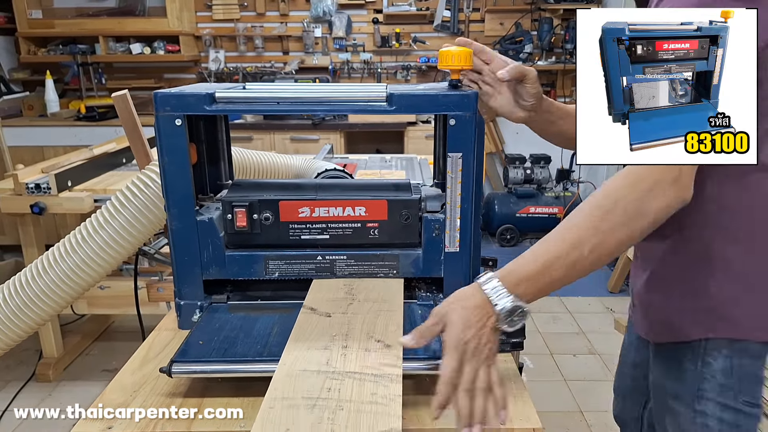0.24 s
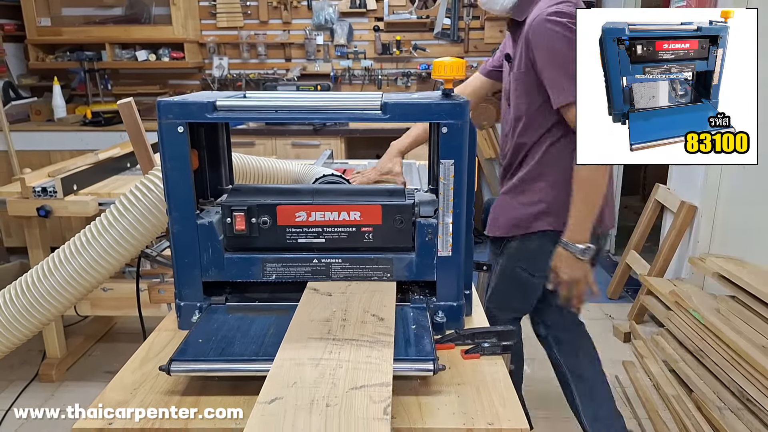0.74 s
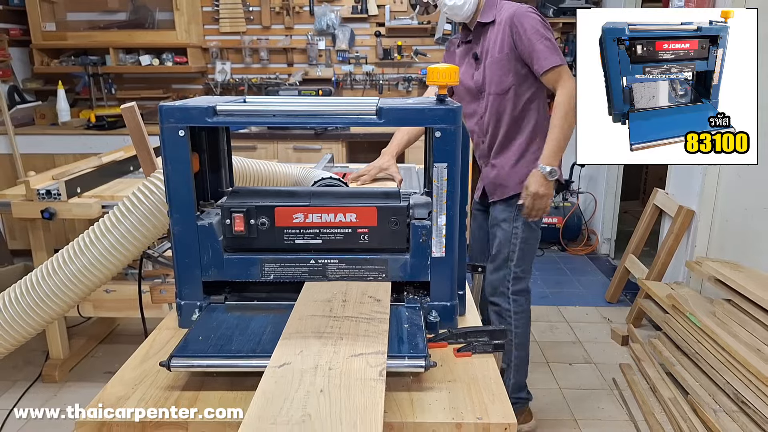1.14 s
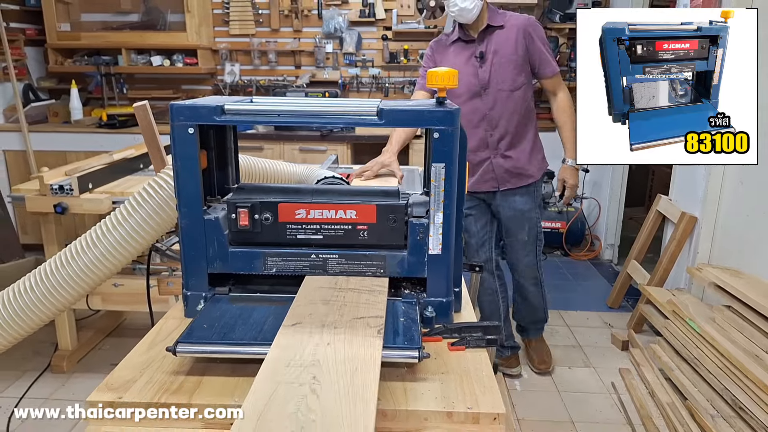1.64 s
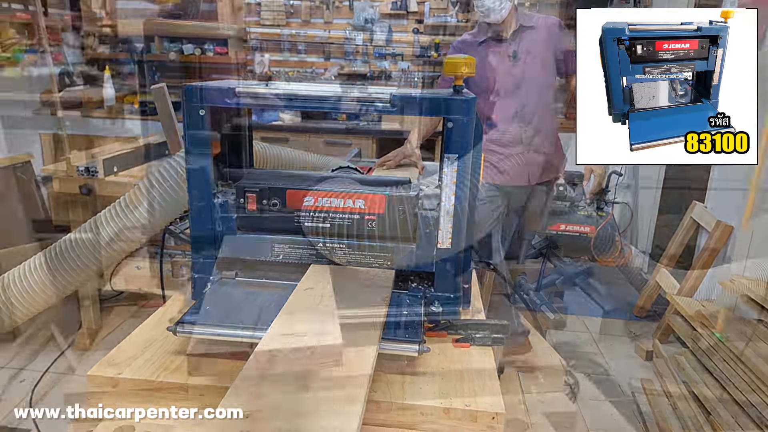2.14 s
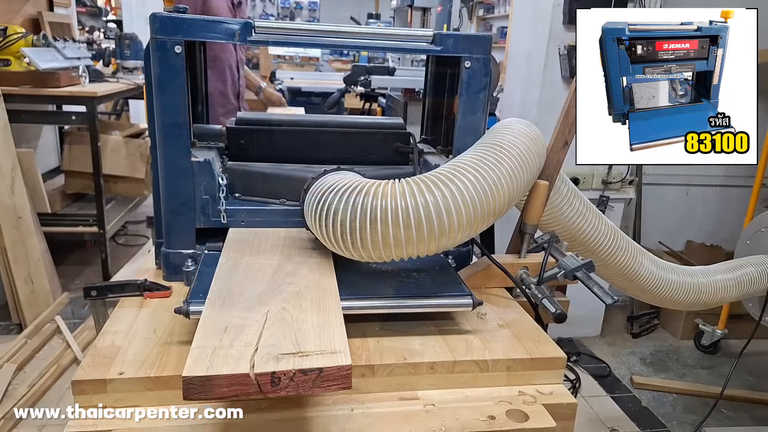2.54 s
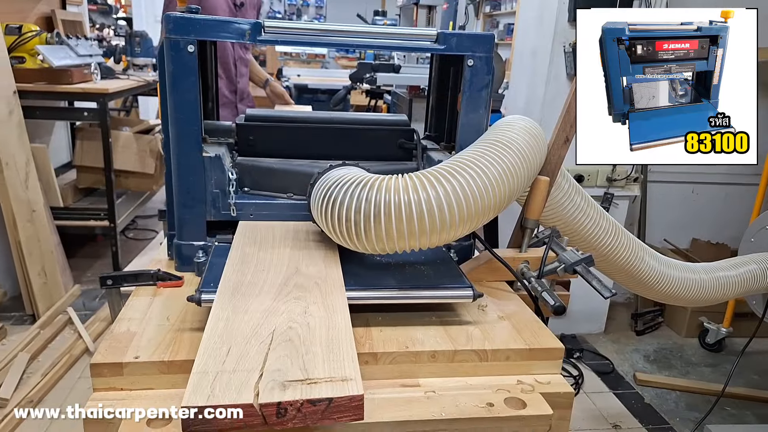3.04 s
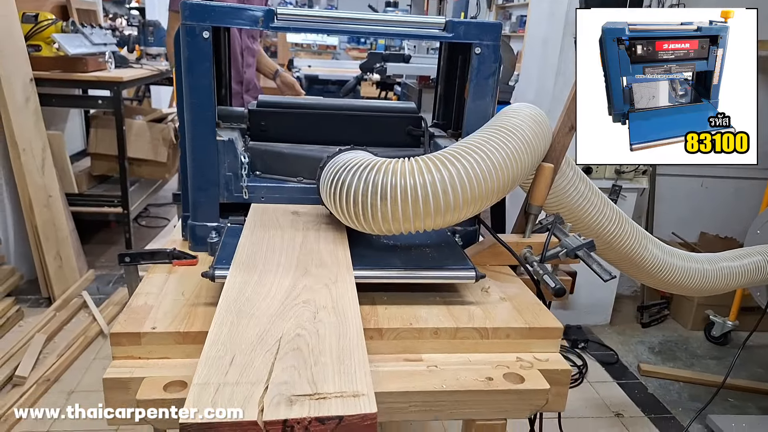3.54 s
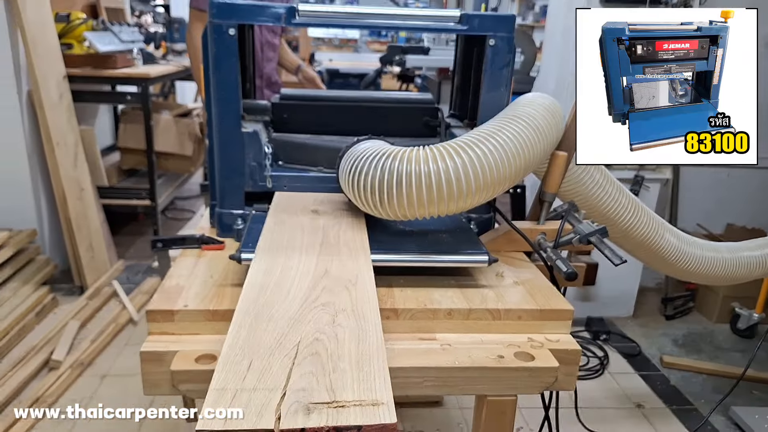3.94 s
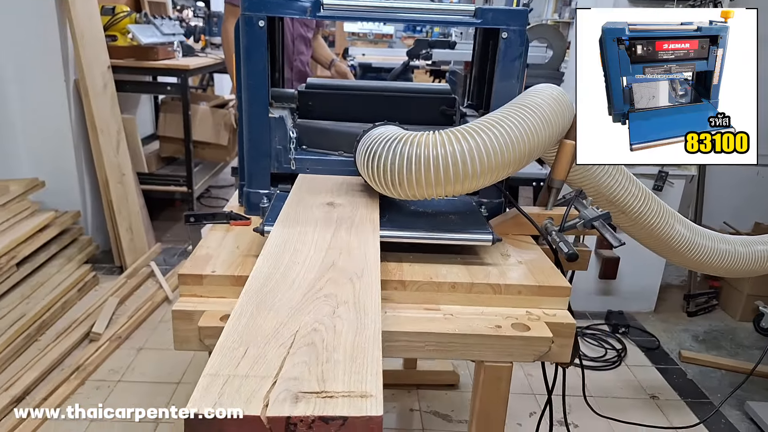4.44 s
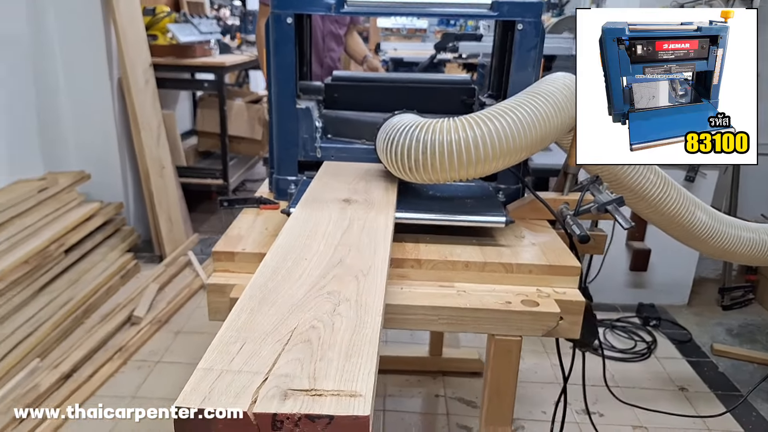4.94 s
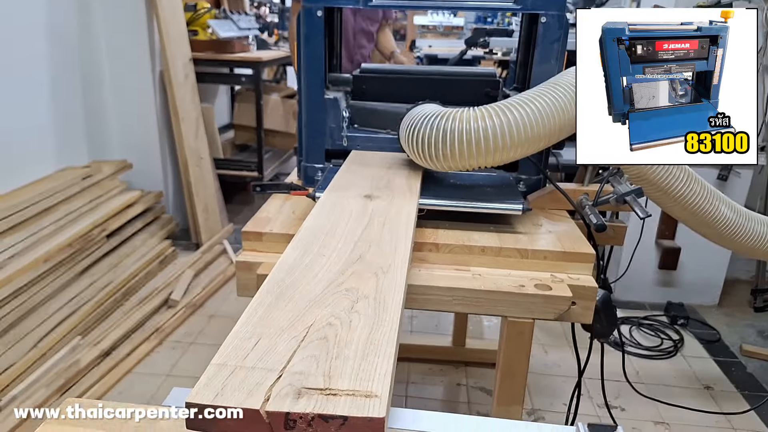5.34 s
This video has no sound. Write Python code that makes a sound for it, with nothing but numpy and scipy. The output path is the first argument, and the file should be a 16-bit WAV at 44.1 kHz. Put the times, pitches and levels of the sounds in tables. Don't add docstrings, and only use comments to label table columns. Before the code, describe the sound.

A benchtop planer is already cutting at 0 s, heard close in a workshop in wide stereo. Rapid knife blows fuse into a harsh, harmonically rich whine, with a strong low tone around 400 Hz, belt-motor hum, faint mains hum and dense hiss of chips and air. The pitch sags over the first second, is lowest near 1.1 s, then climbs as the cut lightens; individual overtones swell and drop unevenly. From about 2.2 to 2.7 s the sound crossfades, dipping slightly, to the outfeed side: a lower, steadier drone with smoother hiss. A table ring near 1.1 kHz grows to a piercing peak around 3.9 s, drops, is faintest near 4.45 s and returns near 4.9 s. Soft low wooden bumps come at about 3.05 and 3.55 s, firmer ones at 5.13 and 5.3 s. Pitch edges up as the cut deepens; the machine is still running at the end.

```python
import sys
import numpy as np
from scipy import signal
from scipy.fft import rfft, irfft, next_fast_len
from scipy.io import wavfile
from scipy.ndimage import map_coordinates

SR = 44100
rng = np.random.default_rng(int(sys.argv[2]) if len(sys.argv) > 2 else 0)


def boost(x):
    u = np.asarray(x, float) / 20
    return 10 ** u


def dump(signal):
    limited = np.clip(np.atleast_2d(signal).T, -1, 1)
    pcm = np.round(limited * 32767).astype(np.int16)
    wavfile.write(sys.argv[1], SR, pcm)


N = 246959
T = np.arange(N) / SR


def curves(table):
    s, *columns = np.transpose(table)
    return [np.interp(T, s, column) for column in columns]


def at_hz(table, hz):
    f, value = np.transpose(table)
    return np.interp(np.log(hz), np.log(f), value)


def bell(x, centre, spread):
    return np.exp(-.5 * ((x - centre) / spread) ** 2)


def walk(rate):
    coarse = T[::64]
    points = rng.standard_normal(int(N / SR * rate) + 4)
    smooth = map_coordinates(points, [1 + coarse * rate], order=3, prefilter=False)
    return 1.45 * np.interp(T, coarse, smooth)


def stereo(mid, side):
    return np.array([mid + side, mid - side])


def spectrum_hz(size):
    return np.maximum(np.arange(size // 2 + 1) * SR / size, 1.)


# (frequency [Hz], side minus mid [dB])
WIDTH = [(60, -6), (110, -6), (200, -14), (380, -6), (700, -10), (1290, -1.5), (2380, 0.5), (4400, 3.5),
         (8120, 0.5), (15000, 0)]


def side_db(hz):
    return at_hz(WIDTH, hz)


def drum(hz, soft, wobble):
    hz = hz + sum(gain * bell(T, s, spread) for s, spread, gain in soft)
    phase = 2 * np.pi * np.cumsum(hz * (1 + wobble * walk(29.7))) / SR
    return hz, phase


def knives(hz, phase, lone_db, cut_db, orders, casing, flares, tail, lone, swell_db, flutter_db):
    peak_share = .6
    bite_db = 1.5 * np.exp(-T / .07)
    edge_db = .9 + .2 * cut_db + bite_db
    out = np.zeros((2, N))
    for k in range(1, 73):
        line_hz = k * hz.mean()
        flare_db = sum(db * bell(T, s, spread) for s, order, spread, db in flares if round(order) == k)
        casing_db = sum(db * bell(k * hz, f, spread) for f, spread, db in casing
                        if abs(f / line_hz - 1) < .12)

        reach = min(k / 24, 1)
        swell = walk(9.0)
        uneven = np.where(swell > 0, peak_share * swell, swell / peak_share)
        wander_db = (k != lone) * reach * swell_db * uneven
        wander_db = wander_db + flutter_db * (.55 + .55 * reach ** .5) * walk(20)

        if k == lone:
            line_db = lone_db
        else:
            own_db = orders[k - 1][1] if k <= len(orders) else at_hz(tail, k)
            line_db = own_db + cut_db + reach ** 2 * edge_db
        level_db = line_db + wander_db + flare_db + casing_db

        angle = k * phase + 2 * np.pi * rng.random() + 0.47 * walk(3.44)
        side_level_db = side_db(line_hz) - 3.5 + 1.8 * walk(2.61)
        side_angle = angle + np.pi / 2 + 0.91 * rng.standard_normal() + 1.03 * walk(5.983)
        side = boost(side_level_db) * np.cos(side_angle)
        out += np.sqrt(2) * boost(level_db) * stereo(np.cos(angle), side)
    return out


def motor(mount, hz, phase, double_db):
    belt = 2.6
    centre, width, peak_db, off_db = mount
    angle = belt * phase + 0.12 * walk(11)
    hum = np.cos(angle) + boost(double_db + 2.2 * walk(3.9)) * np.cos(2 * angle)
    resonance = np.exp(-((belt * hz - centre) / width) ** 4)
    level_db = off_db + (peak_db - off_db) * resonance
    return np.sqrt(2) * boost(level_db + 0.82 * walk(14)) * stereo(hum, 0.36 * np.sin(angle))


def hiss(spectrum, phase, chips_db, trim_db, gate):
    size = next_fast_len(N)
    f = spectrum_hz(size)
    shape = boost(at_hz(spectrum, f))
    shape /= np.sqrt(np.mean(shape ** 2 * (f > 8000) * (f < 15000)))
    mid = rfft(rng.standard_normal(size)) * shape
    side = rfft(rng.standard_normal(size)) * shape

    lead = np.clip(0.51 * (1 - f / 9000), 0, 1)
    side = (np.sqrt(1 - lead ** 2) * side + 1j * lead * mid) * boost(side_db(f))

    puff = np.cos(phase) + 1.2 * np.cos(2 * phase + 2.1)
    shared = walk(4.79)
    out = 0
    for hz in 22 * 2 ** np.arange(0, 10, .5):
        band = np.cos(np.pi * np.clip(np.log2(f / hz), -.5, .5)) ** 2
        flicker = boost(0.7 * shared + 1.43 * walk(9))
        gain = flicker * (1 + gate * min(hz / 4000, 1) * puff)
        out = out + gain * stereo(irfft(mid * band, size)[:N], irfft(side * band, size)[:N])
    return out * boost(chips_db + trim_db)


# (time [s], drum rate [Hz], knife line [dB], depth of cut [dB], chip flow [dB])
INFEED = [
    (0, 225.2, -39.5, 2, -39.5),
    (.2, 219.9, -38, 3, -38),
    (.47, 208.7, -37.5, 1.8, -38.5),
    (.8, 206.3, -37, 2, -37),
    (1.12, 200, -34, 0.9, -37),
    (1.39, 203, -32, -0.1, -40),
    (1.57, 207, -34.5, -0.1, -40.4),
    (1.96, 209.6, -33.5, -1.5, -38),
    (2.4, 218.4, -31.5, -2.5, -42),
]
# (time [s], spread [s], rate gain [Hz])
IN_SOFT = [
    (.36, 0.0503, -0.78),
    (1.79, 0.0835, 1.11),
    (2.2, 0.099, -0.41),
]
# (multiple of drum rate [1], level [dB])
IN_ORDERS = [(1, -58.7), (2, -35.6), (3, -48.7), (4, -40.4), (5, -42.2), (6, -36.0), (7, -41.9), (8, -40.9),
             (9, -44.4), (10, -36.3), (11, -40.8), (12, -39.5), (13, -40.6), (14, -38.0), (15, -40.9),
             (16, -39.7), (17, -41.1), (18, -42.3), (19, -43.4), (20, -47.4), (21, -46.2), (22, -44.5),
             (23, -46.2), (24, -46.3)]
# (multiple of drum rate [1], level [dB])
IN_TAIL = [(25, -47), (30, -53), (39, -53.5), (47, -62), (59, -60), (72, -68)]
# (frequency [Hz], spread [Hz], level [dB])
IN_CASING = [(872, 16, 5.5), (1000, 16, 6.0), (1128, 60, -4.5), (1376, 32, -10.0), (1536, 32, 12.0),
             (1808, 16, 6.0), (1936, 60, -4.0), (3184, 8, -15.5), (3424, 60, -5.0), (4352, 8, 8.0),
             (4552, 32, -5.5), (5184, 16, 7.5)]
# (time [s], multiple of drum rate
# [1], spread [s], level [dB])
IN_FLARES = [(0.08, 10, 0.065, -9), (0.1, 16, 0.13, 10), (0.12, 12, 0.22, -5), (0.18, 14, 0.059, -6),
             (0.3, 7, 0.039, 8.5), (0.3, 19, 0.074, 1), (0.34, 22, 0.05, -12.0), (0.34, 24, 0.05, -16.5),
             (0.48, 8, 0.14, 7), (0.519, 13, 0.17, -6), (0.58, 18, 0.092, -5), (0.74, 6, 0.08, -3),
             (0.84, 10, 0.094, 7.5), (0.88, 7, 0.16, 6), (1.02, 16, 0.05, 9), (1.08, 11, 0.052, 4),
             (1.22, 4, 0.082, -15), (1.3, 18, 0.04, 8), (1.48, 14, 0.036, -14), (1.52, 8, 0.13, -12),
             (1.54, 18, 0.065, -6), (1.82, 27, 0.13, 6), (2.02, 7, 0.32, -5), (2.08, 6, 0.32, 3),
             (2.08, 14, 0.028, 9.5), (2.1, 12, 0.05, -13.0), (2.12, 32, 0.08, 11), (2.2, 18, 0.13, -9.5),
             (.01, 20, .05, 9), (.02, 19, .05, 6), (.04, 21, .08, 4.5), (.12, 18, .15, 4),
            (.27, 2, 0.022, -8), (.38, 17, .09, 6), (.41, 2, 0.024, -8), (.42, 11, .12, 6),
            (.94, 2, 0.057, -7), (1.06, 14, .05, 3.5), (1.45, 4, .06, 6), (2.05, 2, .04, -4),
            (2.14, 4, .09, 5.5)]
# (centre [Hz], half width [Hz], peak [dB], off-peak [dB])
IN_MOTOR = (552, 14.5, -45, -56.5)
# (frequency [Hz], density [dB per Hz])
IN_HISS = [(25, -28), (60, -5.5), (130, -6.5), (250, 5), (500, 5), (1200, 12), (3200, 8.5), (5500, 4),
           (8300, 2), (9800, -4), (11000, -4.5), (12200, 3), (13500, -1), (15600, -2.5)]


def infeed_side():
    hz, knife_db, cut_db, chips_db = curves(INFEED)
    hz, phase = drum(hz, IN_SOFT, wobble=0.0005623)
    comb = knives(hz, phase, knife_db, cut_db, IN_ORDERS, IN_CASING, IN_FLARES, IN_TAIL,
                  lone=2, swell_db=2.2, flutter_db=2.76)
    hum = motor(IN_MOTOR, hz, phase, double_db=-18)
    air = hiss(IN_HISS, phase, chips_db, trim_db=-3.5, gate=0.7)
    return comb + hum + air


def mains():
    return np.sqrt(2) * boost(-64) * np.sin(2 * np.pi * 148 * T)


# (time [s], drum rate [Hz], table ring [dB], depth of cut [dB], chip flow [dB])
OUTFEED = [
    (2.5, 183.5, -35.5, -2.5, -42.5),
    (3.0, 183.8, -31, 0.2, -38.5),
    (3.18, 185.1, -27.5, 1.85, -37.5),
    (3.92, 185.1, -21, 1, -38.5),
    (4.04, 182.5, -29.5, 0.1, -38.5),
    (4.45, 182, -35, -1, -38.5),
    (4.89, 184.4, -25.5, -0.65, -38.5),
    (5.12, 187, -29.5, 1.2, -38.5),
    (5.6, 188.9, -30.5, 2, -40),
]
# (time [s], spread [s], rate gain [Hz])
OUT_SOFT = [
    (3.65, .12, -.5),
    (4.229, .05, 2.2),
    (5.36, .08, -0.53),
]
# (multiple of drum rate [1], level [dB])
OUT_ORDERS = [(1, -57.8), (2, -40.4), (3, -43.5), (4, -39.8), (5, -39.3), (6, -29.3), (7, -40.0),
              (8, -40.5), (9, -42.0), (10, -43.4), (11, -38.8), (12, -46.5), (13, -39.5), (14, -43.2),
              (15, -40.6), (16, -39.7), (17, -39.8), (18, -43.2), (19, -41.0), (20, -44.6), (21, -47.0),
              (22, -47.2), (23, -46.0), (24, -50.9)]
# (multiple of drum rate [1], level [dB])
OUT_TAIL = [(25, -50.5), (29, -54), (44, -54.5), (52, -62), (68, -62), (72, -65)]
# (frequency [Hz], spread [Hz], level [dB])
OUT_CASING = [(915, 4.5, -1), (947, 8, 6.5), (1484, 5.6, -7), (1520, 8, 10), (1851, 15, 5.5),
              (1846, 16, -8), (2465, 99, 4), (2646, 14, -10.5), (2825, 5.1, 8), (3040, 5.6, 10),
              (3760, 10, -6), (5920, 8, 12)]
# (time [s], multiple of drum rate,
# rounded [1], spread [s], level [dB])
OUT_FLARES = [(2.77, 15, 0.29, -4), (2.89, 22, 0.15, 12), (2.91, 21, 0.061, 3), (2.93, 8, 0.15, 11),
              (3.11, 18, 0.33, 4), (3.11, 31, 0.41, 7.5), (3.13, 17, 0.33, -6), (3.17, 11, 0.12, -18),
              (3.33, 16, 0.45, -4.5), (3.47, 7, 0.2, -10), (3.51, 19, 0.15, 6.5), (3.53, 13, 0.47, -6),
              (3.67, 15, 0.032, -11), (3.67, 17, 0.08, 9), (4.07, 9, 0.1, 4), (4.15, 8, 0.25, 6),
              (4.31, 16, 0.18, 4), (4.49, 3, 0.12, -18), (4.63, 8, 0.073, -16), (4.83, 9, 0.2, -5),
              (4.85, 11, 0.15, 9), (4.87, 16, 0.05, 14.5), (4.91, 17, 0.15, 11.5), (4.93, 19, 0.22, -6),
              (5.11, 12, 0.18, -13), (5.21, 4, 0.48, 4), (5.55, 9, 0.049, 11), (5.55, 11, 0.12, -12.0),
              (2.74, 14, .06, 8), (2.8, 11, .09, 6.5), (3.98, 8, .06, 5), (4.262, 6, 0.03, 7.5),
             (4.3, 5, .2, 3), (4.95, 16, .2, 4), (5.1, 13, .3, 3.5), (5.22, 15, .15, 8),
             (5.38, 5.96, 0.032, -1.5), (5.52, 23, .08, 5), (5.524, 6.04, 0.026, -12), (5.56, 22, .1, 7),
             (5.58, 8, .1, 7), (5.58, 17, .05, 6)]
# (centre [Hz], half width [Hz], peak [dB], off-peak [dB])
OUT_MOTOR = (475.5, 5, -43.5, -51)
# (frequency [Hz], density [dB per Hz])
OUT_HISS = [(25, -24), (60, -16), (130, -6), (250, 3), (500, 5), (1200, 10), (3200, 8.5), (5000, 3),
            (7700, 3.5), (9900, -3), (12200, -0.5), (15600, -1.5)]


def outfeed_side():
    hz, ring_db, cut_db, chips_db = curves(OUTFEED)
    hz, phase = drum(hz, OUT_SOFT, wobble=0.00052)
    comb = knives(hz, phase, ring_db, cut_db, OUT_ORDERS, OUT_CASING, OUT_FLARES, OUT_TAIL,
                  lone=6, swell_db=2.5, flutter_db=1.6)
    hum = motor(OUT_MOTOR, hz, phase, double_db=-5.5)
    air = hiss(OUT_HISS, phase, chips_db, trim_db=-0.66, gate=0.091)
    return comb + hum + air


# (time [s], peak level [dB], mode [Hz], length [s])
KNOCKS = [
    (3.046, -36, 245, 0.094),
    (3.553, -36, 234, 0.12),
    (5.13, -26.5, 249, 0.071),
    (5.298, -29, 245.3, 0.1),
]


def knocks():
    out = np.zeros(N)
    for s, db, hz, length in KNOCKS:
        t = np.clip((T - s + .012) / length, 0, 1)
        push = np.sin(np.pi * t ** 0.81) ** 2
        ring = np.sin(2 * np.pi * hz * T)
        ring += 0.48 * np.sin(2 * np.pi * 1.4 * hz * T)
        ring += 0.33 * np.sin(2 * np.pi * 5.8 * hz * T)
        out += boost(db - 6.0) * push * ring
    return out


# (start [s], end [s])
FADE_S = (2.155, 2.67)


def scene():
    fade = np.interp(T, FADE_S, (0, np.pi / 2))
    dip = boost(-2.5 * np.sin(2 * fade))
    machine = infeed_side() * np.cos(fade) + outfeed_side() * np.sin(fade)
    return machine * dip + mains() + knocks()


def top_cut(x):
    return signal.sosfilt(signal.butter(12, 16570, fs=SR, output="sos"), x)


# (frequency [Hz], left minus right [dB])
PORTS = [(60, -0.5), (110, 0.5), (200, 2), (380, -2), (700, 0), (1290, 0), (2380, -2.5), (4400, -1),
         (8120, -3), (15000, -1.5)]


def record(dry):
    size = next_fast_len(N + 64)
    tilt = boost(at_hz(PORTS, spectrum_hz(size)) / 2)
    pair = irfft(rfft(dry, size) * np.array([tilt, 1 / tilt]), size)[:, :N]
    top = signal.ellip(12, .2, 60, 15440, fs=SR, output="sos")
    mix = signal.sosfilt(top, pair)
    return top_cut(mix)


dry = scene()
out = record(dry)
dump(out)
```